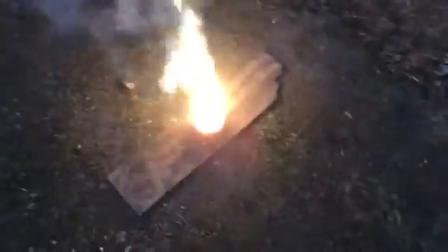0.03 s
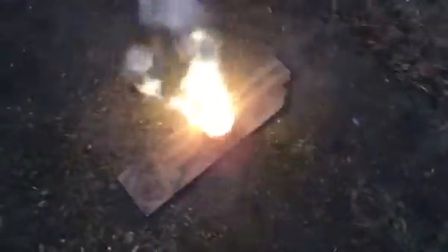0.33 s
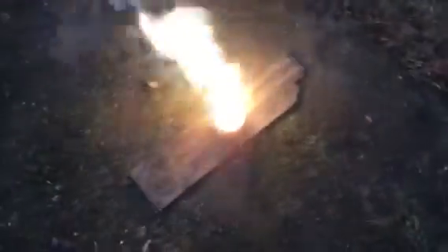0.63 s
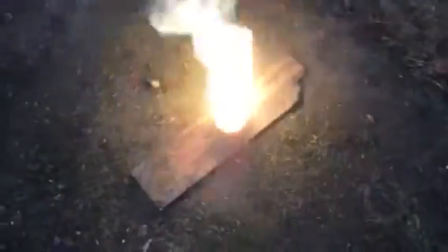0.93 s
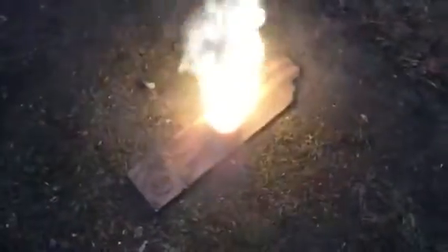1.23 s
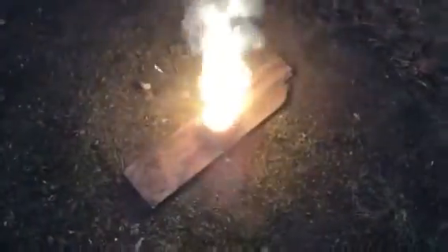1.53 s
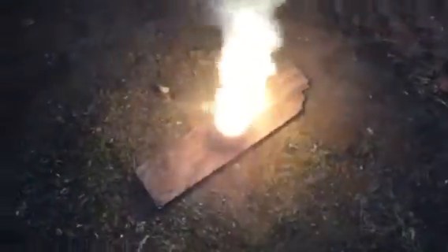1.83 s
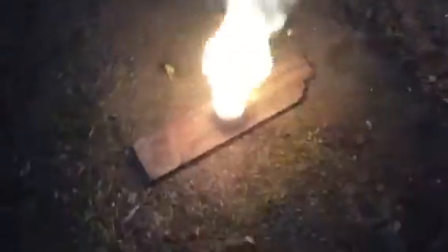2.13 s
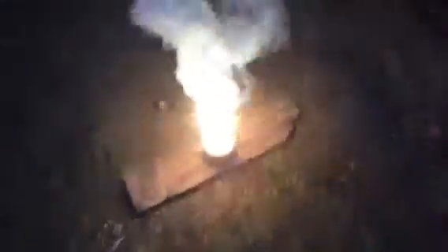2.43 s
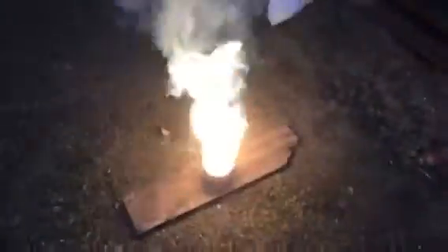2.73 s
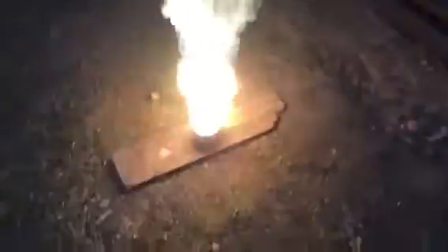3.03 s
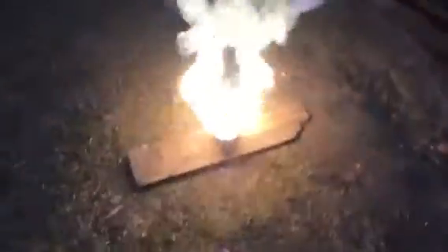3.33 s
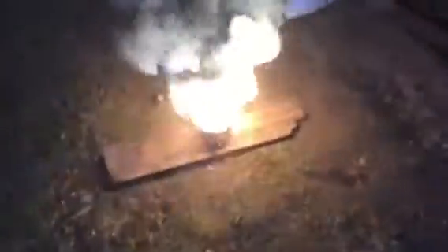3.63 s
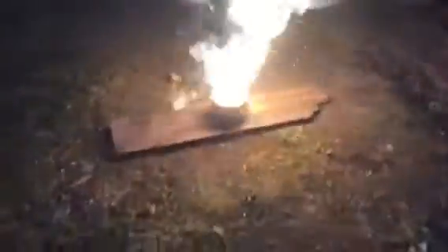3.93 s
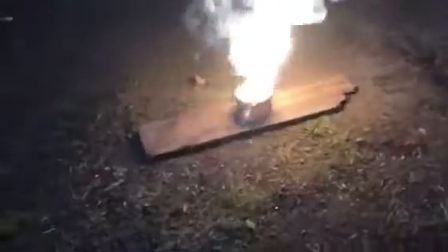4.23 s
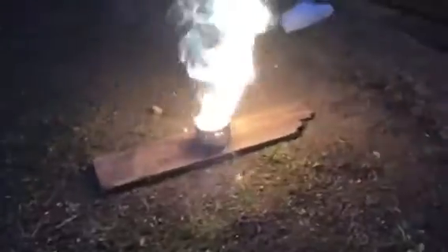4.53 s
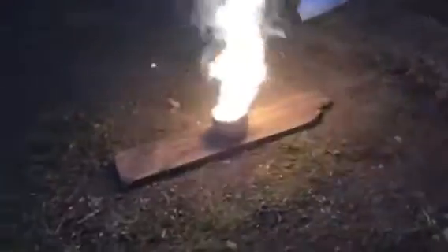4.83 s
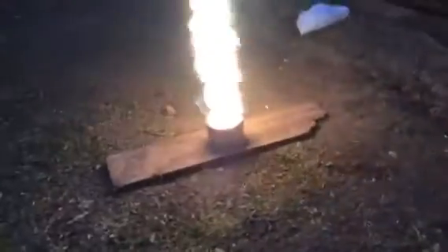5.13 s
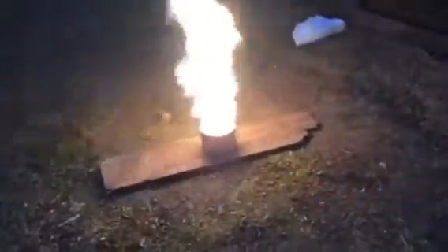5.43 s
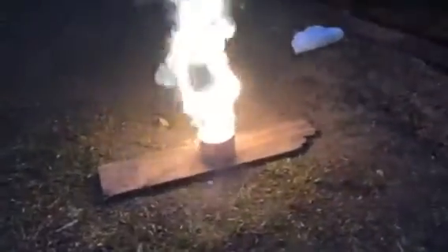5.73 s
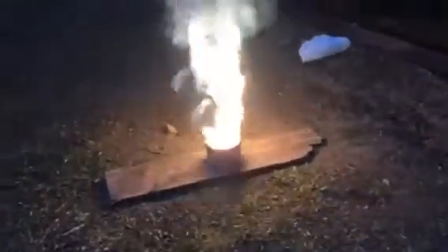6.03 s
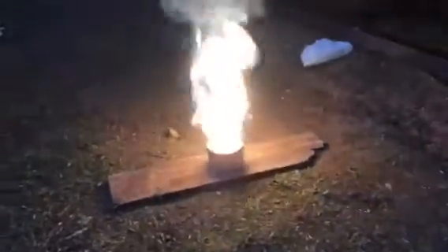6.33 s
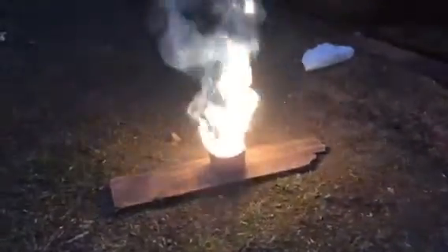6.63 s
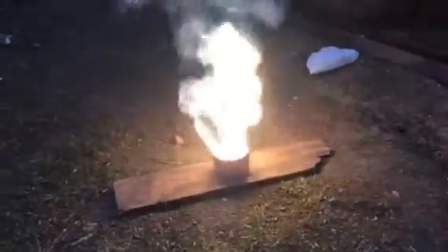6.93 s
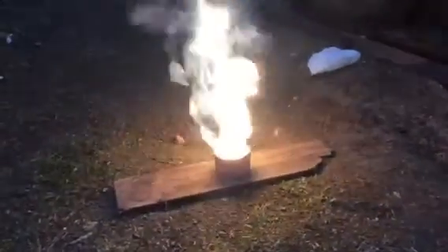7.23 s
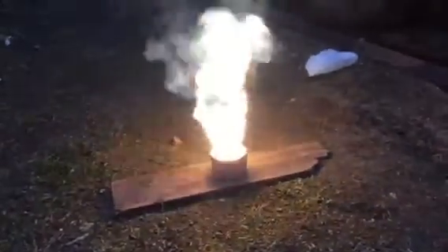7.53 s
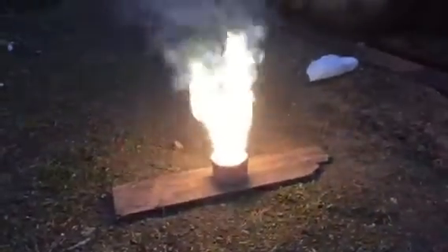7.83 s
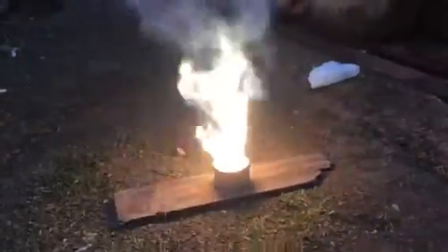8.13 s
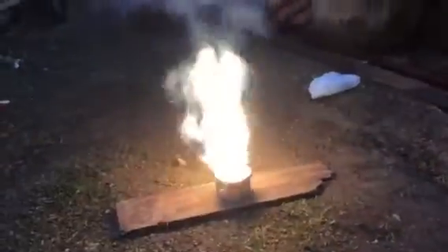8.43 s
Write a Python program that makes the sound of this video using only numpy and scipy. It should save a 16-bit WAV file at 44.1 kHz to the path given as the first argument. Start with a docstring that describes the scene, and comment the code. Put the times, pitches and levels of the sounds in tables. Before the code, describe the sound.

Continuous sizzling hiss from a fierce fire in a can, peppered with sharp snaps and soft gas puffs, settling somewhat later on.

```python
"""Outdoors, a few steps from a small can on a board, in which a flare-like mixture burns hard.
The melt sizzles in countless tiny bursts and settles after five seconds. Bursting droplets crack
and ring the can; gas pockets open with dull puffs. Ground and yard reflect the fire.
A motor hums somewhere behind, and a little moving air bumps the microphone."""
import sys
import numpy as np
from scipy import signal
from scipy.fft import rfft, irfft, next_fast_len
from scipy.io import wavfile
from scipy.ndimage import uniform_filter1d, map_coordinates

SR = 44100
rng = np.random.default_rng(int(sys.argv[2]) if len(sys.argv) > 2 else 0)


def to_wav(s):
    """Save 16-bit WAV."""
    ch = np.atleast_2d(s).T  # columns
    pcm = np.round(np.clip(ch, -1, 1) * 32767)  # PCM
    wavfile.write(sys.argv[1], SR, pcm.astype(np.int16))


N = 383229

# vigour of the burn: t/s, level/dB
BURN = [(0, -52), (0.36, -53), (0.65, -51.5), (0.95, -51), (1.15, -48), (1.57, -50.5), (1.94, -48),
        (2.2, -50.5), (2.6, -50.5), (2.76, -48.3), (3.1, -49.5), (3.5, -48), (3.85, -47.5), (4.05, -50),
        (4.35, -49.3), (4.7, -52), (5.2, -54.5), (6.1, -54.5), (6.4, -54), (6.75, -56), (7.05, -55.5),
        (7.4, -57.5), (8.0, -57.5), (8.69, -55.6)]


def melt():
    """Gas roar, rasp, sizzle and fizz; the hiss colour shifts as the listener moves round the fire."""
    early_hiss = [(150, -7), (290, 1.5), (330, -15.5), (400, -4), (520, -12.5), (830, -13), (950, -5.5),
                  (1400, -7), (3100, -4), (3900, -10.5), (4800, -12.5), (6000, -0.7), (8100, -7),
                  (12000, -3), (15000, -6.5)]  # early hiss spectrum: f/Hz, level/dB
    middle_hiss = [(150, -22), (260, -21), (420, -19), (600, -16.5), (1000, -13.5), (1350, -16.5),
                   (1800, -6.5), (2500, 1.5), (3100, 3), (3900, -3.5), (4800, -6.5), (6200, -4), (8200, -9),
                   (9600, -6), (15000, -4.5)]  # middle hiss spectrum: f/Hz, level/dB
    late_hiss = [(200, -11.5), (380, -13.5), (560, -10), (750, -6), (1100, -2.5), (1520, -1), (1780, -11),
                 (2000, -15), (2150, -0.5), (2350, -13), (2480, 2), (2700, -4), (3000, -1.5), (3900, -7),
                 (4550, -5), (5500, -12.5), (8000, -12.5), (12000, -13.5), (15000, -12.5)]  # late hiss spectrum: f/Hz, level/dB
    gas_roar = [(0, -64), (0.35, -70.5), (0.8, -66.5), (1.2, -62), (2.1, -62.5), (3.45, -63.5),
                (4.2, -56.5), (5.4, -62.5), (7.9, -65), (8.69, -62.5)]  # low band: t/s, level/dB
    rasp = [(0, -7), (0.45, -4), (1.15, -8.5), (1.6, -5.5), (2.45, 2.5), (3.15, -4.5), (3.5, -9.5),
            (4.1, -2.5), (5.0, -9), (5.5, -14.5), (7.5, -9), (8.69, -8.5)]  # band below the sizzle: t/s, offset to vigour/dB
    fizz = [(0, 6), (0.9, 5), (1.2, 2), (1.95, 3.5), (2.15, -2), (2.45, -0.5), (2.6, 3.5), (2.7, 4.5),
            (3.15, 2.9), (3.5, 1), (4.0, 3), (4.4, 2.5), (5.2, 3.2), (6.3, 2.5), (6.7, 2), (8.0, 3),
            (8.69, -1.3)]  # treble band: t/s, offset to vigour/dB
    source = seething(rate_hz=520, spread_db=4.3, gas_db=-1.4, flutter_db=1.9, surge_db=1.84)
    hisses = [unit(signal.oaconvolve(source, ring(colour))[:N])
              for colour in (early_hiss, middle_hiss, late_hiss)]
    early, = curves([(1.8, 0.94), (2.8, 0.21)])
    late, = curves([(3.6, 0), (4.9, 0.95)])
    shares = early, 1 - early - late, late
    vigour_db, roar_db, rasp_db, fizz_db = (curves(rows)[0] for rows in (BURN, gas_roar, rasp, fizz))
    edges_hz = [160, 1500, 2300, 4750, 16000]
    levels_db = roar_db + 0.23, vigour_db + rasp_db - 1.95, vigour_db + 0.92, vigour_db + fizz_db + 0.1
    flicker_db = 0.25 * wobble(7.7)  # whole flame
    out = np.zeros(N)
    for lo, hi, level_db in zip(edges_hz, edges_hz[1:], levels_db):
        band = lambda hz: 1 / (1 + (hz / hi) ** 12) - 1 / (1 + (hz / lo) ** 12)
        gain = amp(level_db + flicker_db + 0.3 * wobble(11))
        out += gain * sum(share * unit(filtered(hiss, band)) for share, hiss in zip(shares, hisses))
    return hot_air(out, depth_db=1.82)


def seething(rate_hz, spread_db, gas_db, flutter_db, surge_db):
    """Spurts of tiny unequal bursts over escaping gas; coarse ones sound low, fine ones high."""
    coarse = [(1200, 2.5), (3000, -4.5), (7000, -7.5)]  # f/Hz, level/dB
    medium = [(1200, -12.5), (3000, 0.0), (9000, -5.5)]
    fine = [(3000, -13.5), (7000, -4.0)]
    gas_share_db, = curves([(0, -1), (4.5, 1), (8.69, 0.5)])  # spitting weakens faster than the gas
    out = np.zeros(N)
    for colour in (coarse, medium, fine):
        sizes = amp(spread_db * np.minimum(rng.standard_normal(N), 2.2))
        ticks = unit((rng.random(N) < rate_hz / SR) * sizes)
        gas = amp(gas_db + gas_share_db + flutter_db * wobble(350)) * rng.standard_normal(N)
        out += signal.oaconvolve(ticks + gas, ring(colour, size=256))[:N]
    spurt_depth, = curves([(4.3, 0.75), (5.1, 0.93)])
    return out * amp(surge_db * spurt_depth * wobble(70))


def cracks(gain_db, variety_db, splinter_db, splinter_t60_s, spray_db, spray_t60_s):
    """Each droplet bursts with a colour of its own, splinters and leaves a brief spray."""
    droplets = [(0.0319, -8.5, 8500.0, 0.95), (0.0659, -14, 10500.0, 2), (0.1021, -13.5, 8500.0, 1.7),
                (0.1365, -13.0, 12200.0, 0.69), (0.1565, -11.5, 4500.0, 1.7),
                (0.2604, -12.5, 14000.0, 1.05), (0.2669, -18, 9800.0, 1.3), (0.3449, -13.5, 6900.0, 1.1),
                (0.3887, -8.5, 4760, 1.9), (0.4109, -19, 8000.0, 2.2), (0.5139, -12.5, 14000.0, 0.84),
                (0.5439, -17, 6000.0, 4.0), (0.5889, -15, 4500.0, 1.6), (0.6065, -14.5, 3700.0, 2.3),
                (0.6286, -14.0, 11300.0, 0.82), (0.721, -18, 4200.0, 1.5), (0.7438, -20, 5200.0, 2.4),
                (0.7595, -17, 7400.0, 1), (0.7896, -13, 6400.0, 2.6), (0.8019, -12.5, 8500.0, 2.2),
                (0.8927, -15.5, 3900.0, 1.9), (0.9117, -13, 3400, 1), (0.9137, -17, 1800.0, 0.41),
                (0.9211, -6.5, 4530, 2), (1.0254, -13.5, 4500.0, 2.2), (1.0489, -10, 4200, 1.7),
                (1.0536, -9, 3700.0, 1.8), (1.0642, -9, 5200.0, 0.7), (1.0733, -8.5, 6000.0, 1.2),
                (1.0886, -17.0, 4200.0, 2.4), (1.1033, -12.5, 5200.0, 2.8), (1.1378, -12.5, 14000.0, 0.56),
                (1.1487, -13.5, 4800.0, 2.8), (1.1722, -9.0, 6000.0, 1.0), (1.1868, -15.0, 14000.0, 0.5),
                (1.2011, -10.5, 3900.0, 1.7), (1.234, -14.5, 3200.0, 2.2), (1.2727, -2.5, 6900.0, 1.1),
                (1.2953, -13.5, 14000.0, 0.38), (1.3198, -19.5, 1900.0, 3.5), (1.3366, -6.5, 10500.0, 1.5),
                (1.3791, -7.5, 9800.0, 1.6), (1.4006, -18, 5200.0, 1.3), (1.4201, -10, 6000.0, 2.2),
                (1.4328, -18, 3400.0, 1.9), (1.4796, -9.5, 4500.0, 0.82), (1.5053, -13, 3400.0, 1.6),
                (1.5522, -15.5, 3700.0, 3.0), (1.5624, -13, 3900.0, 2.7), (1.5834, -2.5, 14000.0, 0.73),
                (1.5915, -21, 3200.0, 0.5), (1.6248, -15.5, 3900.0, 1.7), (1.6533, -19.5, 2800.0, 5.5),
                (1.6737, -14.0, 6400.0, 4.0), (1.6993, -11.5, 4800.0, 1.7), (1.7208, -14, 4500.0, 1.2),
                (1.7672, -7, 3900.0, 0.58), (1.7693, -12, 3200, 1.8), (1.861, -9.5, 3900.0, 1.7),
                (1.8941, -14, 4500.0, 2), (1.9564, -12, 3400.0, 2.7), (1.9709, -10.5, 8000.0, 0.86),
                (2.0221, -17, 4500.0, 2.2), (2.0606, -9.0, 2100.0, 1.5), (2.0897, -15.5, 4200.0, 1.6),
                (2.1338, -20, 3900.0, 3.3), (2.1831, -12.5, 3400.0, 3.2), (2.256, -16.0, 2400.0, 1.6),
                (2.3428, -15.5, 3900.0, 3.6), (2.4023, -18, 2200.0, 4.0), (2.4113, -18.5, 3900.0, 1.7),
                (2.4742, -13, 4500.0, 1.6), (2.4884, -11.5, 2800.0, 3.2), (2.5954, -13, 3430, 2.5),
                (2.6547, -17, 4500.0, 1.1), (2.7166, -9, 4470, 1.1), (2.7643, -7, 14000.0, 0.83),
                (2.7969, 0.5, 3700.0, 2.4), (2.9076, -6.0, 4500.0, 2.4), (2.9721, -21, 4200.0, 0.74),
                (2.9839, -12.5, 3400.0, 2.6), (3.1047, -9.5, 5100, 1.4), (3.1203, -15, 9800.0, 0.7),
                (3.1372, -17.0, 4800.0, 2.2), (3.1526, -14, 5600.0, 3.0), (3.1832, -6.5, 3660, 1.5),
                (3.1865, -13, 4200, 1), (3.1984, -16.0, 5200.0, 1.5), (3.2149, -6, 3400.0, 4.6),
                (3.3178, -15.0, 5600.0, 1.3), (3.4135, -14, 3200.0, 1.8), (3.43, -13.5, 6000.0, 1.1),
                (3.4359, -16.0, 6900.0, 1.9), (3.4463, -14, 6400.0, 2.6), (3.5191, -11, 6400.0, 3.5),
                (3.5662, -2.5, 4200.0, 1.1), (3.5868, -27, 3700.0, 3.6), (3.5946, -10.5, 5600.0, 2.3),
                (3.6065, -13.5, 4500.0, 0.34), (3.7132, -15.5, 4200.0, 0.98), (3.7255, -8.5, 8500.0, 4.0),
                (3.7428, -23, 3400.0, 1.0), (3.7506, -13.5, 4800.0, 2.7), (3.8069, -12.5, 4200.0, 2.2),
                (3.8355, -7.0, 6400.0, 2.1), (3.8466, -11, 3700.0, 3.8), (3.9075, -7, 2220, 1.7),
                (3.929, -10.5, 14000.0, 0.36), (3.9472, -18, 4200.0, 1.3), (3.9933, -13.5, 6900.0, 2.2),
                (4.0286, -11, 5200.0, 4.9), (4.0623, -5.5, 5600.0, 1.5), (4.0844, -14, 4800.0, 2.2),
                (4.2254, -13, 6900.0, 1.3), (4.2487, -18.0, 3400.0, 0.83), (4.2658, -11, 3900.0, 1.0),
                (4.3517, -14.5, 4800.0, 4.0), (4.3784, -10.5, 4800.0, 1.9), (4.4019, -13.5, 7400.0, 2.1),
                (4.4461, -9, 4500.0, 0.63), (4.4875, -11, 7400.0, 1.0), (4.5242, 3, 13000.0, 1.06),
                (4.5533, -19, 14000.0, 0.78), (4.6145, -8, 4800.0, 1.7), (4.6574, -17.5, 3700.0, 1.9),
                (4.6857, -15, 3000.0, 0.56), (4.779, -7.0, 14000.0, 0.84), (4.8612, 1.5, 14000.0, 0.58),
                (4.8668, -19, 3400, 2), (4.8764, -21, 14000.0, 0.88), (4.9789, -14.5, 3700.0, 1.2),
                (5.0223, -19, 5600.0, 0.7), (5.057, -20, 5200.0, 1.6), (5.1218, -19.5, 1800.0, 0.42),
                (5.2053, -11.5, 14000.0, 0.54), (5.2321, -18, 9800.0, 1.9), (5.2679, -18.5, 6400.0, 0.5),
                (5.3358, -14.5, 6400.0, 1.3), (5.4201, -20.0, 14000.0, 0.94), (5.5095, -19, 14000.0, 1.0),
                (5.567, -18.0, 14000.0, 3.0), (5.6269, -19.5, 5200.0, 3.1), (5.7048, -13.5, 3370, 0.58),
                (5.8106, -12.5, 5600.0, 1.2), (5.8905, -15.5, 4200.0, 3.0), (5.9044, -18, 4770, 4.4),
                (6.0544, -19.5, 4800.0, 0.54), (6.0922, -22, 5600.0, 2.2), (6.1584, -23.5, 3400.0, 2.4),
                (6.3267, -15.5, 1840, 2.5), (6.3599, -21.0, 4500.0, 4.0), (6.4088, -16, 1900.0, 0.89),
                (6.5456, -13.5, 3680, 2.5), (6.558, -22, 3200.0, 1.7), (6.8105, -21, 1800.0, 0.7),
                (6.8296, -13.5, 3200.0, 1.5), (6.8463, -19, 4500.0, 1.3), (6.857, -27, 2200.0, 1.0),
                (6.8672, -23, 7400.0, 0.88), (7.1783, -14, 3200.0, 1.5), (7.1867, -16.5, 3200.0, 1.0),
                (7.2932, -15.5, 8000.0, 0.5), (7.323, -22.0, 5200.0, 4.8), (7.3293, -17, 3700.0, 2.3),
                (7.4183, -25, 5600.0, 1.7), (7.4367, -22, 5600.0, 4.0), (7.4537, -18, 4200.0, 0.7),
                (7.5133, -25, 3700.0, 3.0), (7.5277, -21.0, 14000.0, 0.39), (7.5471, -18, 9200.0, 0.41),
                (7.6011, -19.5, 5600.0, 0.81), (7.6677, -20, 1800.0, 0.71), (7.8986, -9.5, 3570, 2.8),
                (7.9517, -18.5, 3740, 3.4), (8.159, -21.5, 4500.0, 4.0), (8.2076, -10, 5200.0, 1.1),
                (8.2572, -16.5, 6000.0, 3.0), (8.3753, -17.5, 4800.0, 0.56), (8.3977, -20, 6900.0, 2.2),
                (8.4129, -19.5, 2600.0, 0.5), (8.4317, -14.5, 14000.0, 0.32), (8.5178, -17, 2400.0, 1.5),
                (8.5875, -23.5, 5600.0, 4.0), (8.5958, -23, 3200.0, 1.9), (8.6129, -22, 4800.0, 4.4),
                (8.6318, -20.5, 2800.0, 1.9)]  # loudest bursts: t/s, level/dB, f/Hz, focus (higher is narrower)
    spectrum = [(100, -37.5), (400, -6), (650, -13.5), (1200, -9.5), (1900, -12.5), (3000, -8),
                (3900, -13.5), (5000, -14.5), (6300, -12.5), (8000, -15), (9700, -13), (12000, -10.5),
                (15000, -19)]  # mean crack colour: f/Hz, level/dB
    out = np.zeros(N)
    for start_s, db, hz, focus in list(droplets) + lesser_droplets():
        colour = ring([(f, level + variety_db * rng.standard_normal()) for f, level in spectrum])
        t = np.arange(len(colour)) / SR
        crack = amp(db + gain_db) * burst(hz, colour, focus)
        crack = crack + can(crack, t)
        add(out, start_s, crack)
        for share_db, t60_s in ((splinter_db, splinter_t60_s), (spray_db, spray_t60_s)):
            bits = rng.standard_normal(len(t)) ** 3 * amp(-60 * t / t60_s)
            add(out, start_s, amp(share_db) * signal.fftconvolve(crack, bits / np.linalg.norm(bits)))
    return out


def lesser_droplets(count=480):
    """A harder burn throws more and louder small droplets. Rows: t/s, level/dB, f/Hz, focus."""
    vigour_db, = curves(BURN)
    rate_hz = 42 * 2 ** ((vigour_db + 50) / 11)  # doubles every 11 dB
    thrown = np.cumsum(rate_hz) / SR
    shift, size, pitch, focus = np.clip(rng.standard_normal((count, 4)), -2, 2).T
    start_s = np.searchsorted(thrown, np.arange(count) + shift) / SR
    level_db = np.interp(start_s, *np.transpose(BURN)) + 25.5 + 0.3 * size
    rows = np.transpose([start_s, level_db, 6170 * 2 ** (0.77 * pitch), 2.7 * np.exp(0.32 * focus)])
    return list(rows[(start_s > 0) & (start_s < N / SR)])


def can(crack, t, centre_hz=3030, spread=0.11, t60_s=0.0057, gain_db=-6.5):
    """A burst briefly rings the can's cavity; the pitch depends on where it happens."""
    decay = amp(-60 * t / t60_s)
    hz = centre_hz * np.exp(spread * rng.standard_normal())
    cavity = 2 * decay / decay.sum() * np.cos(2 * np.pi * hz * t)
    return amp(gain_db) * signal.fftconvolve(crack, cavity)[:len(t)]


def puffs(gain_db, rush_db, rush_t60_s):
    """Larger gas pockets open with a dull push and a short rush."""
    pockets = [(0.007, -29, 600), (0.63, -39, 250), (1.068, -27, 900), (1.274, -32, 300), (1.321, -37, 500),
               (1.584, -31, 700), (1.769, -31, 500), (2.48, -28, 250), (2.764, -26.5, 500),
               (2.908, -35.5, 900), (3.716, -19.5, 700), (3.726, -27, 500), (3.788, -27, 1200),
               (3.835, -27, 447), (3.908, -27, 600), (4.063, -23, 300), (4.449, -25, 1100),
               (4.527, -19.5, 905), (4.678, -24.5, 600), (4.779, -25, 900), (4.862, -26.5, 900),
               (5.122, -34, 600), (5.811, -30, 700), (6.409, -29, 600), (6.811, -32, 1000),
               (7.899, -32, 900), (8.208, -30, 700), (8.43, -33, 900)]  # gas leaving the melt: t/s, level/dB, f/Hz
    spectrum = [(50, -4), (180, 6), (550, -1.5), (1100, 0), (3000, -9), (9000, -25)]  # puff colour: f/Hz, level/dB
    out, colour = np.zeros(N), ring(spectrum)
    t = np.arange(len(colour)) / SR
    for start_s, db, hz in pockets:
        push = amp(db + gain_db) * burst(hz, colour)
        rush = rng.standard_normal(len(t)) * amp(-60 * t / rush_t60_s)
        add(out, start_s, push)
        add(out, start_s, amp(rush_db) * signal.fftconvolve(push, rush / np.linalg.norm(rush)))
    return out


def burst(hz, colour, focus=1):
    """A pressure jump and the suction after it, coloured, with unit energy."""
    s = 1j * np.fft.rfftfreq(len(colour), 1 / SR) / hz
    bandpass = (s / (1 + s) ** 2) ** max(focus, .2)
    wave = irfft(rfft(colour) * bandpass)
    return wave / np.linalg.norm(wave)


def hot_air(x, depth_db, size=512):
    """Turbulent hot air shades narrow bands for a moment."""
    spectra = signal.stft(x, nperseg=size)[2]
    patches = uniform_filter1d(rng.standard_normal(spectra.shape), size=6, axis=0)
    patches = uniform_filter1d(patches, size=18, axis=1)
    return signal.istft(spectra * amp(depth_db * unit(patches)), nperseg=size)[1][:N]


def ground(x, echo_db, dull_hz):
    """A duller echo off the ground; as the listener moves, its lag sweeps a comb through the hiss."""
    echo_lag = [(0, .00533), (1.8, .00523), (2.3, .0055), (2.7, .00553), (3.35, .0051), (3.8, .00545),
                (4.6, .00568), (5.4, .00568), (7, .0056), (8.69, .00561)]  # reflection delay: t/s, lag/s
    lag_s, = curves(echo_lag)
    dull = filtered(x, lambda hz: 1 / np.sqrt(1 + (hz / dull_hz) ** 2))
    return amp(echo_db) * map_coordinates(dull, [np.arange(N) - lag_s * SR])


def yard(x):
    """Scatter from the surroundings; the bass lasts longest."""
    decay = [(200, 0.46), (2500, 0.2), (12000, 0.21)]  # scatter decay: f/Hz, t60/s
    hz, t, spectra = signal.stft(rng.standard_normal(SR // 2), SR, nperseg=256)
    tail = signal.istft(spectra * amp(-60 * t / along(decay, hz)[:, None]), SR, nperseg=256)[1]
    return signal.fftconvolve(x, tail / np.linalg.norm(tail))[:N]


def air_bumps(gain_db):
    """Eddies at the microphone: a few low pressure swings that swell and fade."""
    eddies = [(0.01, -41, 190, 0.005), (0.02, -41, 47, 0.011), (0.116, -48, 55, 0.0088),
              (2.761, -49, 57.5, 0.024), (3.374, -32, 142.4, 0.0028), (3.394, -45, 214, 0.005),
              (3.428, -42, 207, 0.004), (3.419, -37.5, 78, 0.01), (3.44, -41.5, 46.7, 0.04),
              (3.598, -41, 152, 0.0078), (3.68, -54, 50, 0.044), (4.87, -39, 62, 0.0052)]  # pressure bumps: t/s, level/dB, f/Hz, rise/s
    out, t = np.zeros(N), np.arange(SR // 2) / SR
    for start_s, db, hz, rise_s in eddies:
        swell = t / rise_s * np.exp(1 - t / rise_s)
        add(out, start_s, amp(db + gain_db) * swell * np.sin(2 * np.pi * hz * t))
    return out


def motor(drift_rad):
    """An unsteady hum; its main partial grows as the listener moves round the fire."""
    hum = [(0, -60.5), (2.2, -59), (3.4, -57), (8.69, -56)]  # base level: t/s, level/dB
    partials = [(119.5, 1, 1.5, 0.35), (241.3, -5.5, -15.5, 1.5), (91.7, -6.5, -15, 4)]  # hum lines: f/Hz, start offset/dB, end offset/dB, waver/dB
    base_db, = curves(hum)
    out, t = np.zeros(N), np.arange(N) / SR
    for hz, start_db, end_db, waver_db in partials:
        level_db = base_db + np.linspace(start_db, end_db, N) + waver_db * wobble(2.3)
        out += amp(level_db) * np.sin(2 * np.pi * hz * t + drift_rad * wobble(1))
    return np.sqrt(2) * out


def rumble(level_db):
    """Steady low outdoor noise."""
    spectrum = [(20, -49), (40, -5.5), (60, -6), (90, -1.5), (140, -4.5), (200, -8), (300, -16.5),
                (500, -20), (2000, -28.5)]  # ambient colour: f/Hz, level/dB
    return amp(level_db) * unit(filtered(rng.standard_normal(N), lambda hz: amp(along(spectrum, hz))))


def amp(db):
    return 10 ** (np.asarray(db) / 20)


def unit(x):
    return x / np.sqrt(np.mean(x ** 2) + 1e-20)


def along(points, hz):
    """Interpolate (f/Hz, value) points on a log axis."""
    f, values = np.transpose(points)
    return np.interp(np.log(hz + 1), np.log(f + 1), values)


def curves(rows):
    """One value per sample for each column after t/s."""
    times_s, *columns = np.transpose(rows)
    return [np.interp(np.arange(N) / SR, times_s, column) for column in columns]


def wobble(rate_hz):
    """A smooth curve through random knots."""
    knots = rng.standard_normal(int(N * rate_hz / SR) + 4)
    return map_coordinates(knots, [np.arange(N) * rate_hz / SR])


def filtered(x, response):
    """Apply a zero-phase gain, response(hz)."""
    size = next_fast_len(N + SR // 2)
    return irfft(rfft(x, size) * response(np.fft.rfftfreq(size, 1 / SR)), size)[:N]


def ring(spectrum, size=2048):
    """Minimum-phase impulse response of (f/Hz, level/dB) points."""
    cepstrum = irfft(np.log(amp(along(spectrum, np.fft.rfftfreq(size, 1 / SR)))))
    cepstrum[1:size // 2] *= 2
    cepstrum[size // 2 + 1:] = 0
    return irfft(np.exp(rfft(cepstrum)))


def add(track, start_s, sound):
    start = int(np.clip(round(start_s * SR), 0, N - 1))
    track[start:start + len(sound)] += sound[:N - start]


def scene():
    """The fire with its echoes, and the quiet surroundings."""
    spits = cracks(gain_db=-0.73, variety_db=2.0, splinter_db=-8.5, splinter_t60_s=0.011,
                   spray_db=-17, spray_t60_s=0.2)
    fire = melt() + spits + puffs(gain_db=3.5, rush_db=-1.5, rush_t60_s=0.056)
    echoes = ground(fire, echo_db=-8.0, dull_hz=2000) + amp(-13.5) * yard(fire)
    return (fire + echoes + air_bumps(gain_db=-2.0) + motor(drift_rad=0.057) + rumble(level_db=-62.5))[None]


def record(dry):
    """A small microphone: weak deep bass, band-limited treble."""
    response = [(20, -10), (32, -10), (44, 0.5), (9900, 0), (10500, -6), (11200, -2.5)]  # microphone colour: f/Hz, level/dB
    top_hz = 15500
    band_limit = lambda hz: np.clip((top_hz - hz) / 400 + .5, 0, 1)
    return filtered(dry[0], lambda hz: amp(along(response, hz)) * band_limit(hz))[None]


dry = scene()
out = record(dry)
to_wav(out)
```